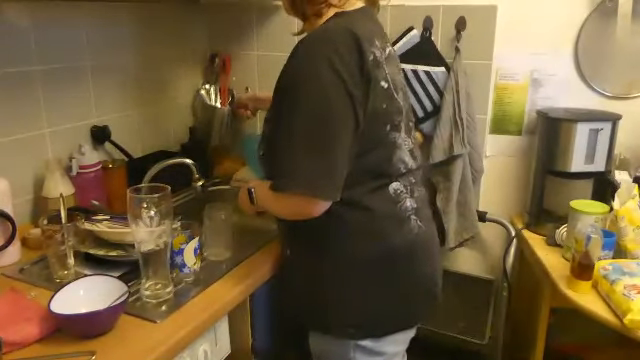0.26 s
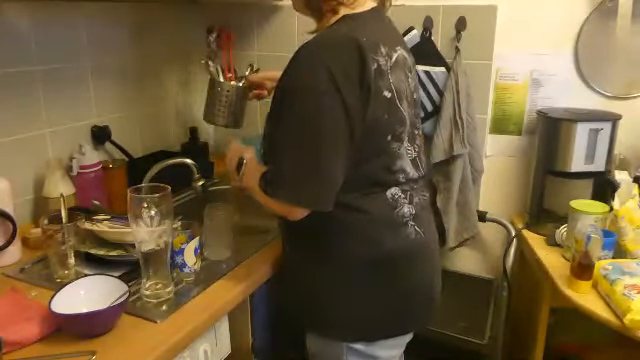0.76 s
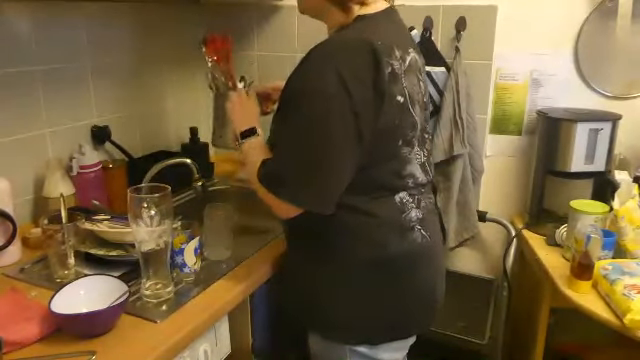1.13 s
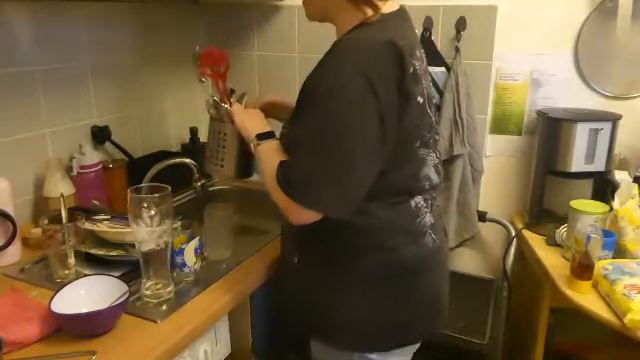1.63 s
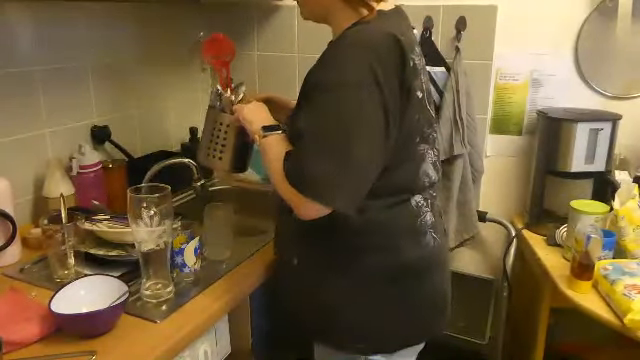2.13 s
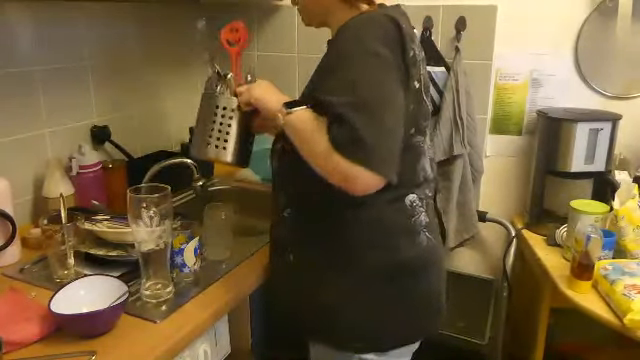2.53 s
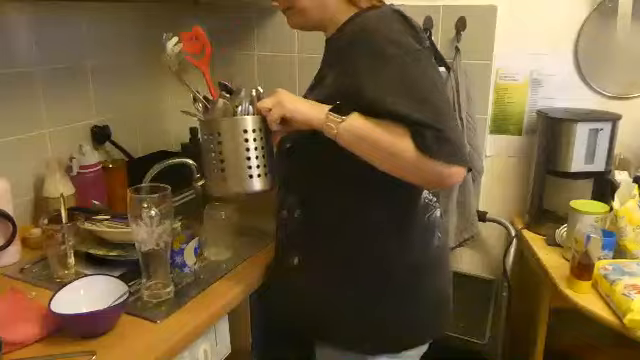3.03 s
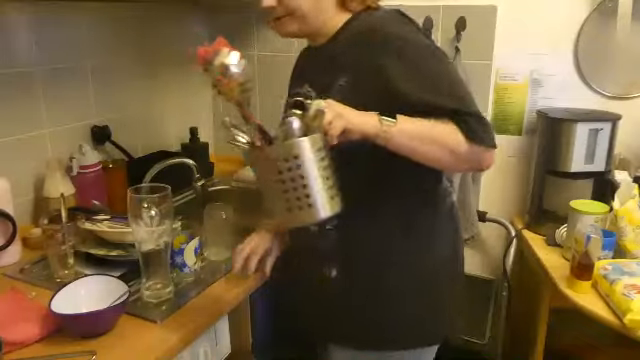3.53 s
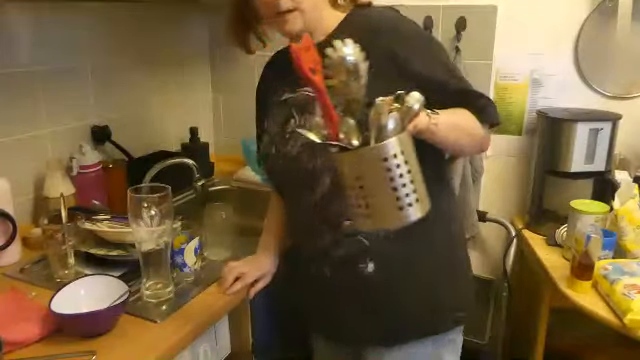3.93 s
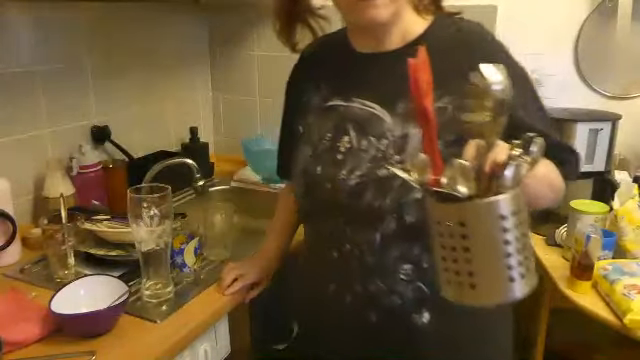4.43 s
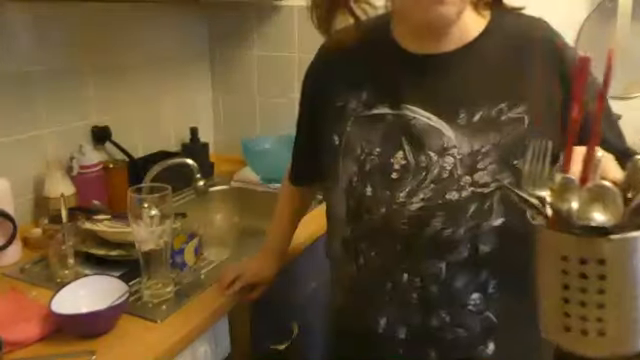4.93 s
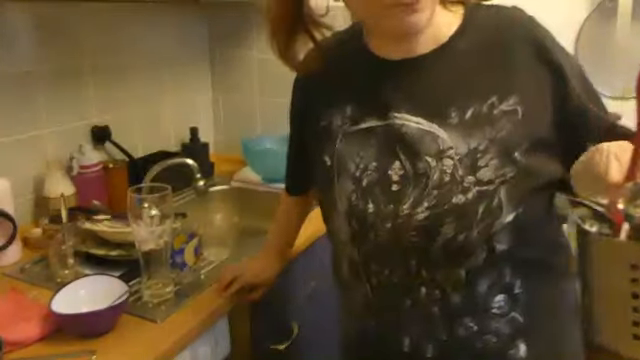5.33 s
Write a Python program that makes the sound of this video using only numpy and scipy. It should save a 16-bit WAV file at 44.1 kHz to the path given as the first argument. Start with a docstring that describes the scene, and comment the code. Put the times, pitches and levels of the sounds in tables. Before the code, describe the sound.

A steel holder packed with cutlery is handled close to a stereo microphone in a small tiled kitchen, over a faint, steady low hum. At 0 to 0.4 s there is a low scrape, a handful of clinks and a dull woody knock near 0.2 s. It goes almost quiet until about 1.1 s, with only faint ticks. From 1.4 s sharp clinks come quickly, and between 2.0 and 2.7 s they merge into a dense, bright metallic rattle, with short ringing from the thin holder wall. After 2.8 s it settles; soft low thuds fall around 3.0 and 3.2 s, with a clear clink at 3.2 s. A quiet gap follows until 4.1 s. Strong clinks ring out at 4.25 and 4.6 s, a brief rattle at 4.7 s, then muffled steps at 4.8, 5.0 and 5.3 s as the last small clinks fade. Echoes are short.

```python
"""Shaking a holder full of cutlery

A steel holder full of cutlery is lifted, shaken about and carried in a small tiled kitchen.
Pieces clink and patter: short bursts of damped tones, with brief ringing from the holder wall.
A low scrape at the start, then dull knocks and steps: dying noise shaped into rumble, notes and floor boom.
Two microphone ports hear the cutlery nearly alike, but filtered-noise hum and echoes differ between them."""
import sys
import numpy as np
from scipy import signal
from scipy.io import wavfile
from scipy.ndimage import uniform_filter1d

SR = 44100
rng = np.random.default_rng(int(sys.argv[2]) if len(sys.argv) > 2 else 0)


def unload_audio(sound):
    """Save the sound as a 16-bit wav file, at the path given as the first command line argument."""
    columns = np.transpose(np.atleast_2d(sound))
    # keep every value between -1 and 1, then stretch to whole-number steps
    steps = np.round(np.clip(columns, -1, 1) * 32767)
    wavfile.write(sys.argv[1], SR, steps.astype(np.int16))


N = 245195  # length in samples


def gain_of(db):
    """Turns decibels into a factor."""
    return 10 ** (np.asarray(db) / 20)


def evened(x):
    """Scales a sound to an average (rms) level of 1."""
    return x / np.sqrt(np.mean(x ** 2) + 1e-20)


def read(points, hz):
    """Reads a table between its points, along a logarithmic pitch axis."""
    table_hz, value = np.transpose(points)
    return np.interp(np.log(hz + 1), np.log(table_hz + 1), value)


def coloured(x, points, size=4096):
    """Filters with the table's spectrum shape, without ringing ahead of the sound; filter energy is 1."""
    hz = abs(np.fft.fftfreq(size, 1 / SR))
    log_gain = np.log(gain_of(np.maximum(read(points, hz), -90)))
    minimum_phase = np.exp(np.conj(signal.hilbert(log_gain)))
    taps = np.fft.ifft(minimum_phase).real[:size // 2]
    return signal.oaconvolve(x, taps / np.linalg.norm(taps))[:len(x)]


def ring(x, hz, t60):
    """One way of vibrating: each impulse starts a sine that dies by 60 dB in t60 seconds."""
    shrink = np.exp(-np.log(1000) / (max(t60, .002) * SR))
    turn = 2 * np.pi * hz / SR
    return signal.lfilter([0, shrink * np.sin(turn)], [1, -2 * shrink * np.cos(turn), shrink ** 2], x)


def note(hz, t60, chatter):
    """One damped tone, struck and then kept going for a moment by dying chatter; its peak is 1."""
    sound = ring(chatter, hz, t60)
    return sound / abs(sound).max()


def train(start_s, size):
    """Places impulses of the given sizes at the given times."""
    return np.bincount(np.clip((start_s * SR).astype(int), 0, N - 1), size, N)


# Colour of the hum shared by both ports: pitch_hz [Hz], relative level_db [dB per Hz]
SHARED_HUM = [(15, -48), (25, -15), (68, -20), (95, -8), (192, -10), (252, -5.5), (349, -7), (470, -7),
              (854, -12.5), (927, -13), (1150, -12.5), (14800, -27), (16500, -39)]
# Colour of the hum that is opposite at the two ports: pitch_hz [Hz], relative level_db [dB per Hz]
OPPOSITE_HUM = [(15, -70), (25, -29), (128, -14.5), (273, -7), (787, -13), (1730, -23), (1880, -22),
                (2670, -26), (3320, -33), (15200, -42), (16500, -77)]


def hum(points, level_db):
    """Steady room noise: coloured noise whose level swells a little, slowly and at random."""
    swell = evened(uniform_filter1d(rng.standard_normal(N), 6000))
    return gain_of(level_db + 0.9 * swell) * evened(coloured(rng.standard_normal(N), points))


def piece(count=400):
    """A knife, fork or spoon wedged among others: a crack, then very many heavily damped tones."""
    hz, size = rng.uniform(281, 16500, count), rng.standard_normal(count)
    t = np.arange(3072)[:, None] / SR
    t60 = 0.041 * (hz / 3000) ** -.3 * rng.uniform(0.25, 2.4, count)  # high tones tend to die sooner
    tones = size * gain_of(-60 * t / t60) * np.sin(2 * np.pi * hz * t)
    sound = evened(tones.sum(1)) / np.sqrt(len(t))
    sound[0] += .4  # the crack
    return sound / np.linalg.norm(sound)


# Tones of the holder wall: pitch_hz [Hz], level_db before strike and colour [dB], t60_s to die by 60 dB [s]
HOLDER_WALL = [(1033, -26, 0.077), (1149.7, -28, 0.052), (1430, -52, 0.028), (1690, -40, 0.012),
               (1993, -39, 0.019), (2108, -33, 0.014), (2427, -32, 0.011), (2900, -34, 0.049),
               (2952, -33, 0.012), (3122, -25.5, 0.017), (3310, -32, 0.035), (3518, -38.5, 0.027),
               (3703, -29, 0.0095), (5160, -52, 0.01), (5200, -45, 0.034), (6330, -55, 0.012),
               (7170, -48, 0.011), (9090, -43, 0.019), (10140, -46.5, 0.034), (10650, -35, 0.022),
               (10980, -44.5, 0.0097)]
# Colour of steel on steel: pitch_hz [Hz], relative level_db [dB per Hz]
STEEL_COLOUR = [(180, -89.5), (300, -32), (457, -17.5), (879, -17), (1020, -21), (1360, -2.5), (2030, 0.5),
                (2620, 1.5), (3040, -5.5), (4480, 3.5), (8200, 6), (9540, 9.5), (15000, -4), (15800, -12),
                (16600, -57)]


def steel(start_s, size, treble_db, count=12):
    """Each contact sounds one of the pieces and rings the holder wall; treble_db sets how bright it is."""
    split_hz = 5500  # treble lies above this
    which = rng.integers(0, count, len(start_s))
    plain, treble = 0, 0
    for k in range(count):
        sound = piece()
        chosen = size * (which == k)
        plain = plain + signal.oaconvolve(train(start_s, chosen), sound)[:N]
        treble = treble + signal.oaconvolve(train(start_s, chosen * gain_of(treble_db)), sound)[:N]
    # below the split the plain sound remains; above it the treble version does
    out = treble + signal.lfilter(*signal.butter(2, split_hz, fs=SR), plain - treble)
    share = rng.standard_normal((len(start_s), len(HOLDER_WALL))) ** 2  # where the wall is struck decides
    for k, (hz, level_db, t60) in enumerate(HOLDER_WALL):
        tilt_db = treble_db / (1 + (split_hz / hz) ** 4)
        strikes = train(start_s, size * share[:, k] * gain_of(tilt_db))
        out += gain_of(level_db) * ring(strikes, hz, min(t60, .2))
    return coloured(out, STEEL_COLOUR)


# How hard the holder is moved about: time_s [s], patter level_db before steel colour [dB], treble_db [dB]
SHAKING = [(0.0, -35.5, -7), (0.12, -43.5, -13.5), (0.29, -43.5, -3), (0.52, -65.5, -9),
           (1.08, -67.5, -1.5), (1.179, -41.5, -6), (1.27, -65.5, -5.5), (1.48, -52, -4),
           (1.62, -52.5, -17), (2.02, -42, -6), (2.118, -27.5, -3), (2.24, -42.5, -10), (2.38, -25, -4.5),
           (2.52, -29, -5.5), (2.631, -29, -7), (2.78, -52, -11), (2.97, -55, -11), (3.06, -43.5, -8),
           (3.33, -56, -9), (3.46, -53, -5), (3.56, -56, -7.5), (3.93, -68, -3.5), (4.6, -57.5, -8.5),
           (4.71, -35.5, -9), (4.82, -45, -7.5), (5.03, -52.5, -7), (5.56, -68.5, -3.5)]
SWELL_S, SETTLE_DB_PER_S = 0.012, 206  # patter after each clink: time to swell, speed of dying away
PATTER_TREBLE_DB, PATTER_TREBLE_SHARE = -7.5, 0.13  # its own treble, plus this share of the clink's treble


def stirring():
    """Level and treble of the patter: it follows the shaking, swells after each clink and settles again."""
    t = np.arange(0, N, 32) / SR
    time_s, level_db, treble_db = np.transpose(SHAKING)
    power = gain_of(2 * np.interp(t, time_s, level_db))  # twice the decibels: power, not height
    weighted_treble = power * np.interp(t, time_s, treble_db)
    for start_s, _, treble_db, *_, patter_db in CLINK_EVENTS:
        after = np.maximum(t - start_s, 0)
        swell = np.minimum(after / SWELL_S, 1) ** 2
        stir = swell * gain_of(2 * (patter_db - SETTLE_DB_PER_S * after))
        power = power + stir
        weighted_treble = weighted_treble + stir * (PATTER_TREBLE_DB + PATTER_TREBLE_SHARE * treble_db)
    return t, np.sqrt(power), weighted_treble / power


JOSTLE_PER_S = 1600  # average number of small contacts per second


def jostle():
    """A dense patter of small contacts that fuse into a wash, a few of them larger."""
    t, level, treble_db = stirring()
    happens = rng.random(N) < JOSTLE_PER_S / SR
    hits = happens * gain_of(2.36 * np.minimum(rng.exponential(1, N), 4))
    at_s = np.flatnonzero(hits) / SR
    size = evened(hits)[hits > 0] * np.interp(at_s, t, level)
    return steel(at_s, size * rng.choice([-1, 1], len(at_s)), np.interp(at_s, t, treble_db))


# Low scrape at the start (first row), then dull knocks and steps:
# time_s just after the onset [s], level_db of the whole sound [dB],
# noise t60_s to die by 60 dB [s], low_note_hz [Hz], low_note_db [dB], high_note_hz [Hz], high_note_db [dB],
# knock_db [dB], floor_boom_db [dB]; the last four levels are set against the whole sound
DULL_EVENTS = [(0.012, -48, 0.31, 450, -5, 800, -7, 2.5, -30),
               (0.206, -21.5, 0.26, 140, -6.5, 470, -32, -14, -30),
               (0.244, -26.5, 0.1, 160, -2.5, 505, -9, -6, -30),
               (2.048, -51, 0.15, 226, 2.5, 400, -13, 7, -20),
               (2.999, -40.5, 0.29, 172, -1.5, 390, -10, -18, -16),
               (3.183, -38.5, 0.18, 157, -5.5, 360, -12, -31, -15),
               (4.797, -33.5, 0.1, 243, -1, 400, -5.5, -15, -13.5),
               (4.975, -42, 0.1, 397, -4.5, 523, -4.5, -16, -26),
               (5.321, -43, 0.15, 254, -1.5, 377, 2.5, -19, -10.5)]
# Colour of the boards' rumble: pitch_hz [Hz], relative level_db [dB per Hz]
BOARD_COLOUR = [(35, -48), (75, -13), (144, -7), (231, 8), (314, -1.5), (484, 0.5), (561, -12), (634, 3.5),
                (1500, -30.5), (1950, -32), (3300, -120)]
FLOOR_HZ, FLOOR_T60_S = 108.6, 0.4  # pitch of the boom, time to die by 60 dB


def scrape_knocks_and_steps():
    """Dying noise drives a rumble of the boards, two rough notes, the slow floor boom and a brighter band."""
    out, t = np.zeros(N), np.arange(SR // 2) / SR
    noises = rng.standard_normal((len(DULL_EVENTS), len(t)))
    knock_band = signal.butter(2, [500, 1800], "band", fs=SR)
    for event, noise in zip(DULL_EVENTS, noises):
        time_s, level_db, t60, low_hz, low_db, high_hz, high_db, knock_db, boom_db = event
        burst = noise * gain_of(-60 * t / t60) * (1 - np.exp(-t / 0.0022))  # soft start, then dying
        sound = 0.34 * coloured(burst, BOARD_COLOUR)
        sound += gain_of(low_db) * note(low_hz, 0.041, burst * gain_of(-60 * t / 0.21))
        sound += gain_of(high_db) * note(high_hz, 0.038, burst * gain_of(-60 * t / 0.094))
        sound += gain_of(boom_db) * note(FLOOR_HZ, FLOOR_T60_S, burst)
        sound += gain_of(knock_db) * signal.lfilter(*knock_band, 4 * burst)
        part = out[round(time_s * SR) - 150:][:len(t)]  # begins 150 samples early
        part += gain_of(level_db) * sound[:len(part)]
    return out


# Distinct clinks: start_s [s], level_db before mixing [dB], treble_db [dB], low_note_hz [Hz],
# low_note_db against the clink [dB], high_note_hz [Hz], patter_db: level of the patter it sets off [dB]
CLINK_EVENTS = [(0.033, -27.5, 0, 2350, -4.5, 9080, -33.5), (0.0894, -16, -12, 2340, -15, 9500, -52),
                (0.14, -12, 0.5, 2910, -23, 8500, -29.5), (0.202, -22, 1.5, 2500, -8.5, 10100, -33.5),
                (0.32, -29.5, 9.5, 2570, -25, 6360, -38.5), (0.349, -34, -6, 1870, -12, 9250, -31.5),
                (0.3649, -21.5, 6, 2810, -5, 9440, -46.5), (0.604, -38.5, -20, 1293, -7, 9500, -43.5),
                (0.7386, -28, -1, 2614, -21, 7350, -53), (1.0657, -44.5, 2, 2220, -11, 9000, -53.5),
                (1.117, -25.5, 1, 2846, -16, 9900, -44.5), (1.387, -34, 6.5, 2800, -26, 9600, -38.5),
                (1.4107, -11, -9, 3270, -18.5, 7550, -32.5), (1.431, -24.5, 11.5, 4000, -9, 9100, -30),
                (1.45, -13, 6, 2750, -30, 9960, -25), (1.509, -6.5, -0.5, 1038, -25, 9500, -22),
                (1.544, -18, -4, 2420, -15, 9100, -33), (1.653, -26, 0.5, 2790, -18, 7400, -32),
                (1.6626, -9, -6.5, 1025, -29, 8150, -33), (1.7178, -29, -5, 2200, -11, 6700, -60),
                (1.812, -15, -3, 1984, -19.5, 10860, -32), (1.8318, -8.5, -2, 3080, -17.5, 7170, -28.5),
                (1.947, -17, -6, 2120, -21.5, 9300, -35), (2.004, -16.5, 1.5, 3070, -22, 8800, -34.5),
                (2.0578, -9.5, -0.5, 2220, -20.5, 10400, -24.5),
                (2.094, -11, 5.5, 2160, -18.5, 9300, -24.5), (2.12, -12.5, 4, 2070, -19, 9450, -40),
                (2.2749, -15, -3, 4330, -21, 10100, -54), (2.3123, -7, -4.5, 3060, -24, 10160, -26),
                (2.3337, -17, 11, 3464, -2.5, 9300, -20.5), (2.419, -8.5, -5, 3150, -15, 9700, -21),
                (2.4456, -5, -1, 3150, -14, 10300, -23.5), (2.548, -15, -15, 3170, -14, 9300, -18),
                (2.5806, -17, 3.5, 4300, -10, 8800, -47.5), (2.6974, -19, 1.5, 3640, -18, 11100, -38),
                (2.817, -24, -27, 3320, -37, 10600, -42.5), (2.8876, -37, -26, 2170, -1.5, 9800, -64),
                (2.9311, -32, 1.5, 2224, -16.5, 10400, -72), (2.9938, -18.5, 12.5, 1380, -17.5, 9800, -29),
                (3.1345, -30.5, -1.5, 2500, -24, 6450, -62), (3.1773, -10, -4.5, 3270, -24, 8950, -28.5),
                (3.2276, -40, -29, 2860, -13, 10460, -59), (3.3808, -35, -1.5, 3150, -14, 8740, -48),
                (3.625, -45, -24, 1124, -9, 7300, -62), (4.134, -25.5, -1, 1040, -31, 9180, -39.5),
                (4.155, -21, -2.5, 2557, -14, 6000, -33.5), (4.2244, -17.5, -3.5, 2500, -17, 8100, -34.5),
                (4.254, -4.5, -8, 2750, -23, 9040, -27), (4.2856, -15.5, 1.5, 2517, -16, 6960, -35.5),
                (4.3194, -24.5, -20.5, 3880, -4, 9850, -44), (4.414, -33, -47, 1245, -2, 6600, -48.5),
                (4.5018, -34, -1.5, 2560, -16, 9800, -53), (4.6243, -2.5, -8.5, 2650, -28, 8570, -27.5),
                (4.703, -24, 3.5, 2620, -28, 9700, -37.5), (4.726, -14.5, -10, 1010, -28, 10300, -49),
                (4.8701, -22.5, -18, 1035, -24, 9600, -58), (5.0513, -26, -15, 2657, -13, 9600, -41),
                (5.111, -21, 2.5, 3240, -19.5, 9640, -39.5)]
RUN_MS = 5.1  # longest spread of one clink's run of contacts
HIGH_NOTE_DB, CRACK_DB = -15.5, -22.5  # levels when treble_db is 0
CRACK_T60_S, DULL_DAMPING = 0.01, 0.38  # crack's time to die by 60 dB; how much dullness shortens the notes


def clinks(count=7):
    """A crack and a quick run of contacts; the struck piece sounds a low and a high note."""
    start_s, level_db, treble_db, *_ = np.transpose(CLINK_EVENTS)
    late = rng.random((len(start_s), count)) * (np.arange(count) > 0)  # the first contact is on time
    size = gain_of(level_db[:, None] - 3.7 * late) * rng.choice([-1, 1], late.shape)
    contact_s = start_s[:, None] + late * RUN_MS / 1000
    out = steel(contact_s.ravel(), size.ravel(), np.repeat(treble_db, count))
    t = np.arange(SR // 4) / SR
    noises = rng.standard_normal((len(start_s), len(t)))
    for event, noise in zip(CLINK_EVENTS, noises):
        start_s, level_db, treble_db, low_hz, low_db, high_hz, _ = event
        lasting = gain_of(DULL_DAMPING * min(treble_db + 3.5, 0))  # dull clinks die sooner
        chatter = noise * gain_of(-60 * t / (0.065 * np.sqrt(lasting))) + 9 * (t == 0)
        low_t60 = 0.07 * (2500 / low_hz) ** 1.4 * lasting  # low notes last longer
        sound = gain_of(low_db) * note(low_hz, low_t60, chatter)
        sound += gain_of(HIGH_NOTE_DB + 1.1 * treble_db) * note(high_hz, 0.01, chatter)
        crack = np.diff(noise, prepend=0) * (1 - np.exp(-t / 0.002))  # bright noise, softened start
        sound += gain_of(CRACK_DB + 1.5 * treble_db - 60 * t / CRACK_T60_S) * crack
        part = out[int(start_s * SR):][:len(t)]
        part += gain_of(level_db) * sound[:len(part)]
    return out


# How long the room's echoes last: pitch_hz [Hz], t60_s to die by 60 dB [s]
ECHO_TIMES = [(100, 0.37), (400, 0.37), (1500, 0.38), (5000, 0.16), (14000, 0.21)]


def room(x):
    """Two echo tails made of scattered single taps, each pitch band dying at its own speed."""
    taps = np.zeros((2, SR))
    at = np.arange(200, SR - 20, 20) + rng.integers(0, 20, (2, (SR - 201) // 20))
    np.put_along_axis(taps, at, rng.choice([-1., 1.], at.shape), 1)
    hz, t, bands = signal.stft(taps, SR, nperseg=256)
    fading = bands * gain_of(-60 * t / read(ECHO_TIMES, hz)[:, None])
    tail = signal.istft(fading, SR, nperseg=256)[1]
    return signal.fftconvolve(x[None], tail / np.linalg.norm(tail[0]), axes=1)[:, :N]


# Colour of the echoes that differ between the ports: pitch_hz [Hz], relative level_db [dB]
ECHO_DIFFERENCE = [(70, -13), (110, -11), (200, -11), (380, -10), (700, -7), (1290, -5.5), (2380, -9),
                   (4400, 1.5), (8120, -4), (15000, 4)]


def scene():
    """Mixes what the two ports share (mid) and what is opposite at them (side)."""
    cutlery, dull = clinks() + jostle(), scrape_knocks_and_steps()
    echo = room(cutlery + gain_of(7) * dull)  # the dull sounds excite the room more strongly
    mid = cutlery + dull + gain_of(-10) * echo[0] + hum(SHARED_HUM, -61)
    side = gain_of(-5) * coloured(echo[1], ECHO_DIFFERENCE)
    side += 0.032 * cutlery + 0.08 * dull + hum(OPPOSITE_HUM, -53)
    return np.array([mid + side, mid - side])


EDGE_HZ = 16500  # upper band limit


def record(dry):
    """The small microphone loses the lowest bass and adds a faint low noise; then comes the band limit."""
    thin = signal.sosfilt(signal.butter(6, 97, "high", fs=SR, output="sos"), dry)
    low_noise = signal.lfilter(*signal.butter(1, 80, fs=SR), rng.standard_normal(dry.shape))
    band_limit = signal.firwin(511, EDGE_HZ, window=("kaiser", 9), fs=SR)
    return signal.oaconvolve(thin + gain_of(-55) * low_noise, band_limit[None], "same")


dry = scene()
out = record(dry)
unload_audio(out)
```